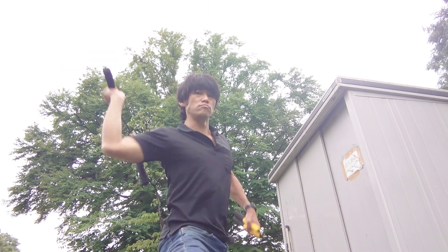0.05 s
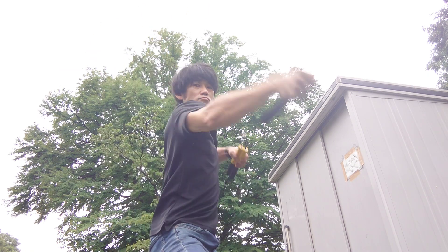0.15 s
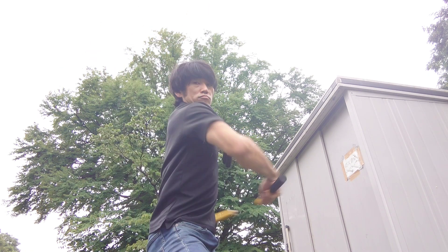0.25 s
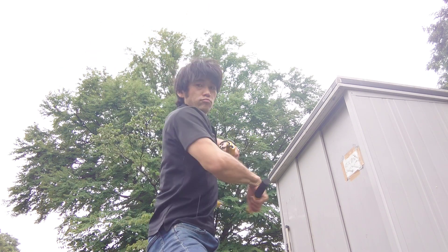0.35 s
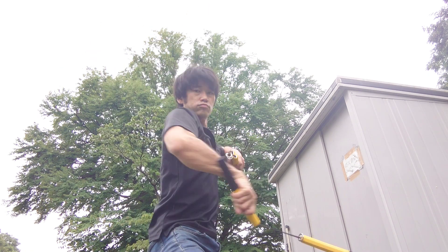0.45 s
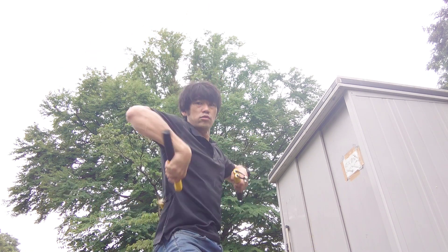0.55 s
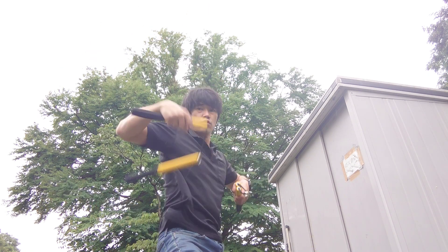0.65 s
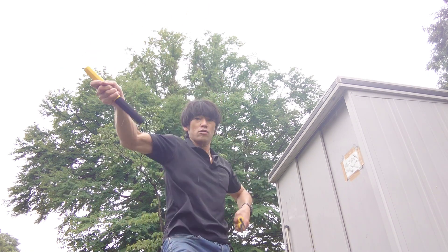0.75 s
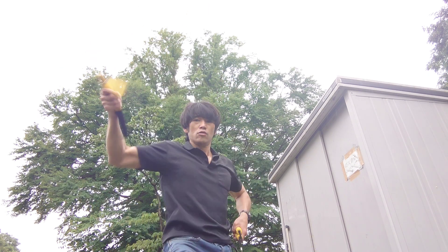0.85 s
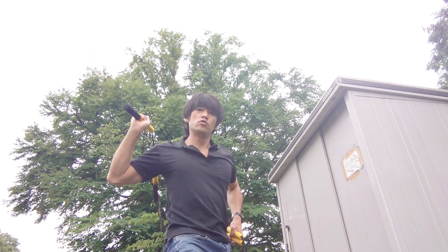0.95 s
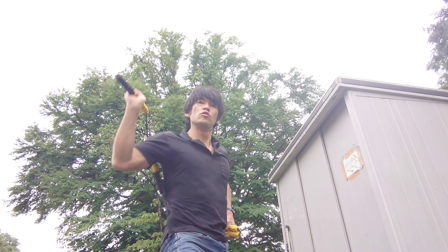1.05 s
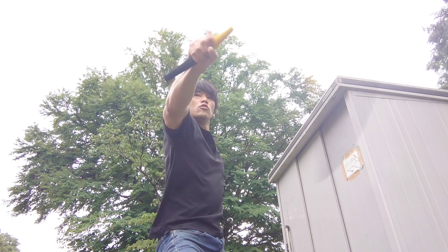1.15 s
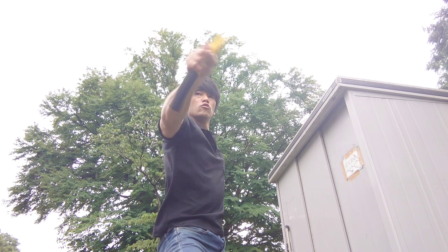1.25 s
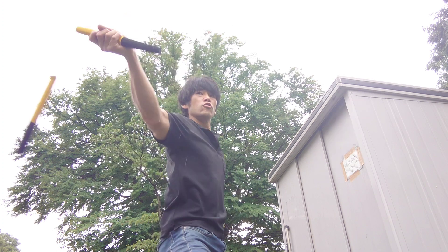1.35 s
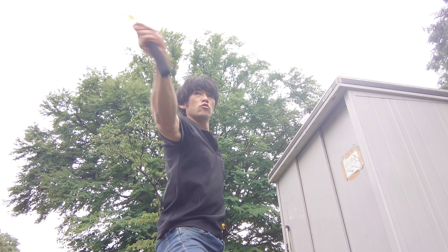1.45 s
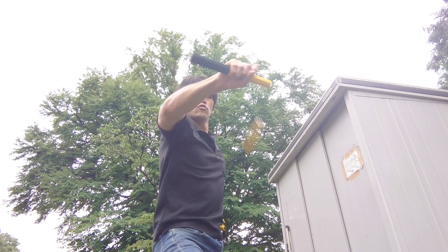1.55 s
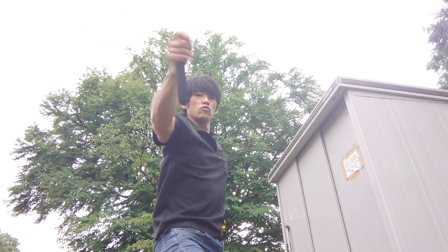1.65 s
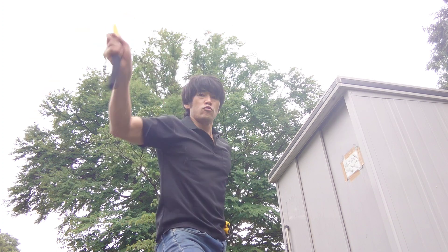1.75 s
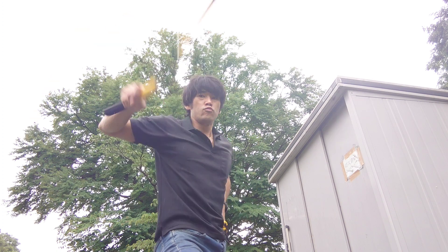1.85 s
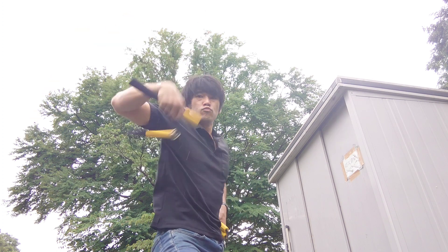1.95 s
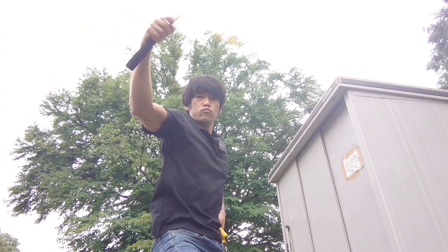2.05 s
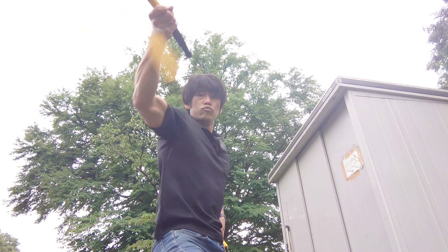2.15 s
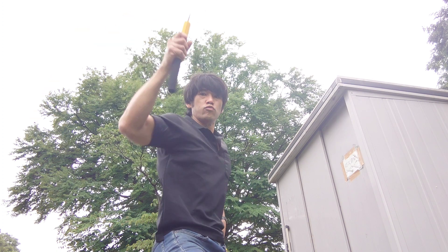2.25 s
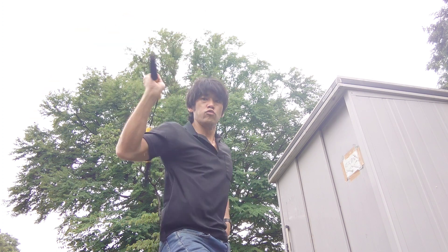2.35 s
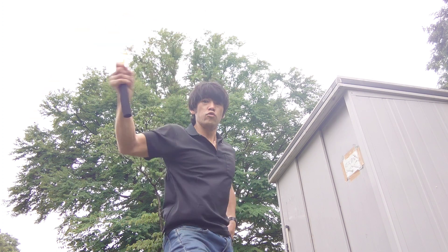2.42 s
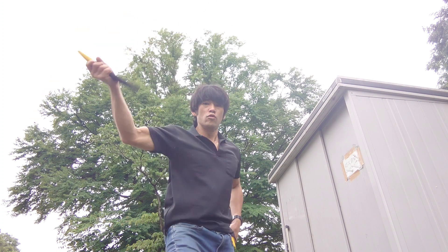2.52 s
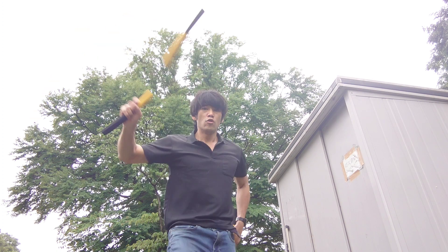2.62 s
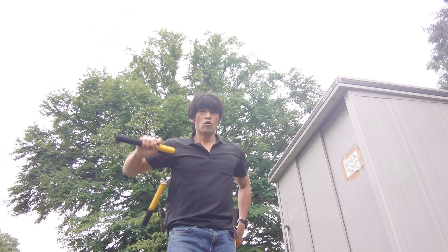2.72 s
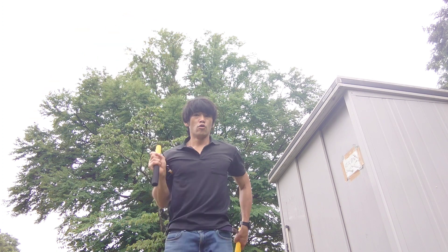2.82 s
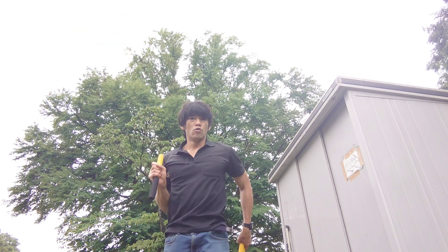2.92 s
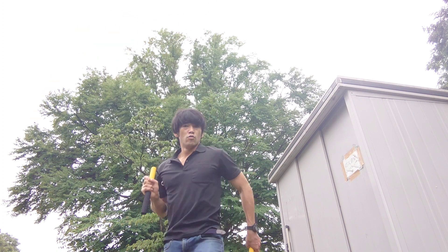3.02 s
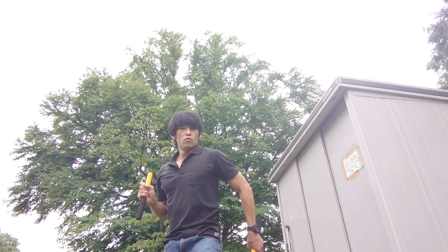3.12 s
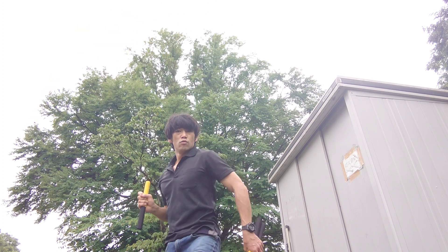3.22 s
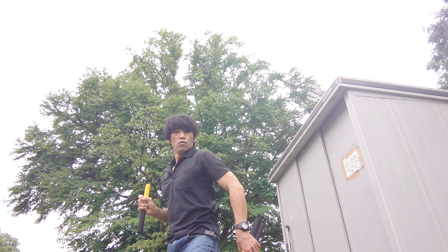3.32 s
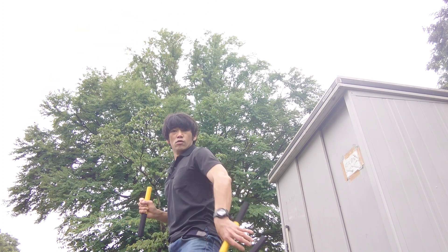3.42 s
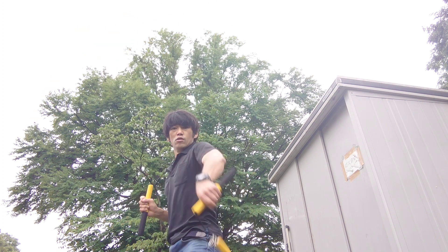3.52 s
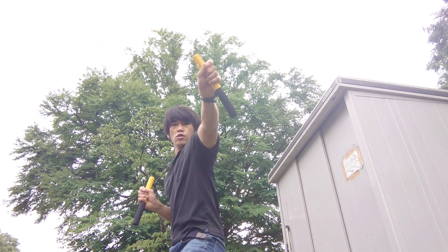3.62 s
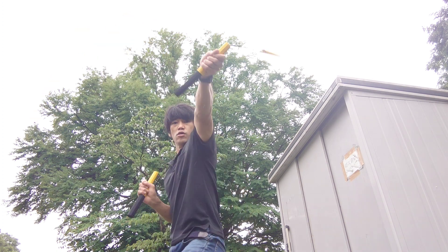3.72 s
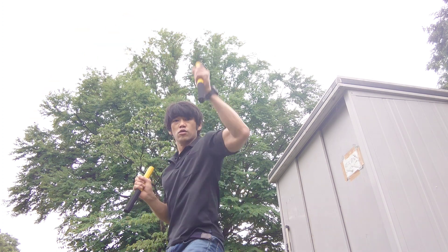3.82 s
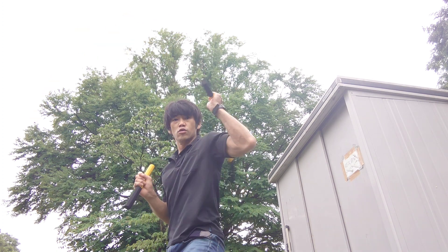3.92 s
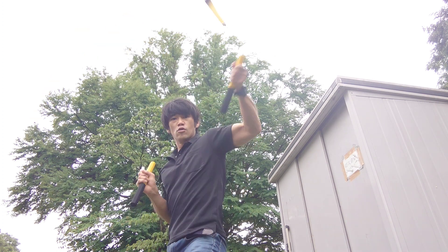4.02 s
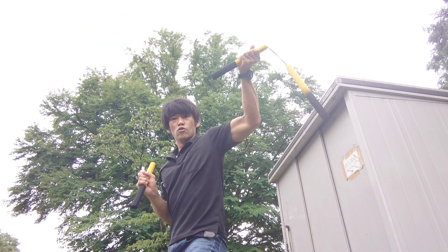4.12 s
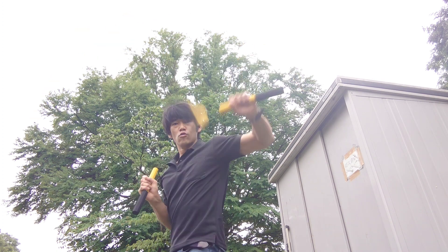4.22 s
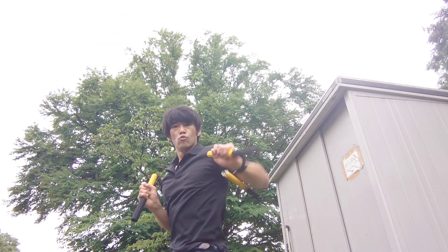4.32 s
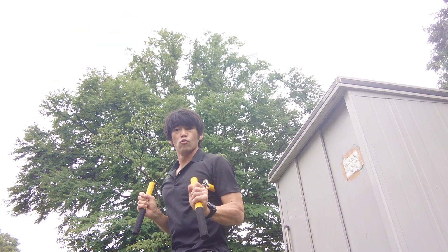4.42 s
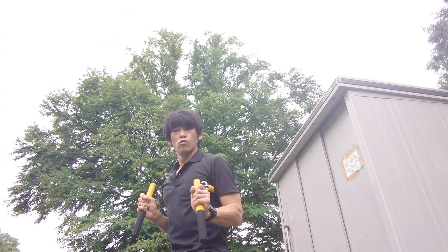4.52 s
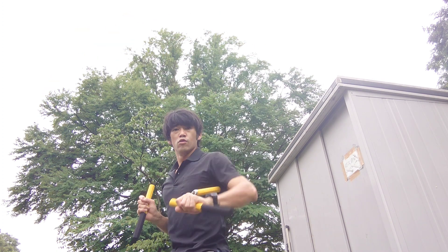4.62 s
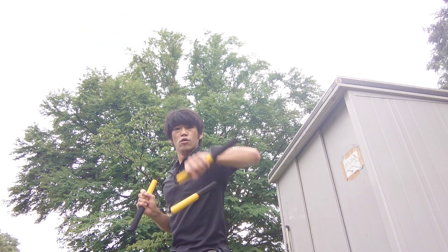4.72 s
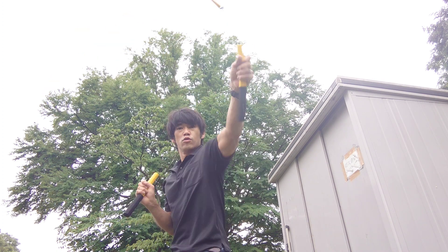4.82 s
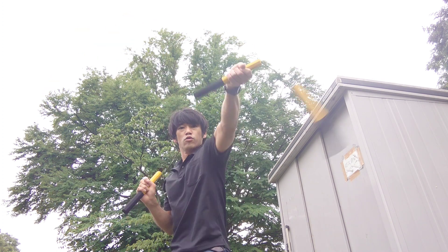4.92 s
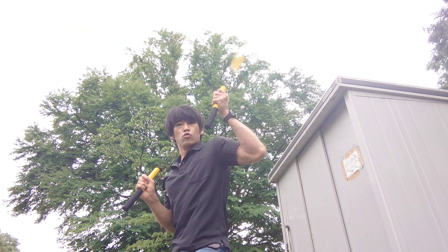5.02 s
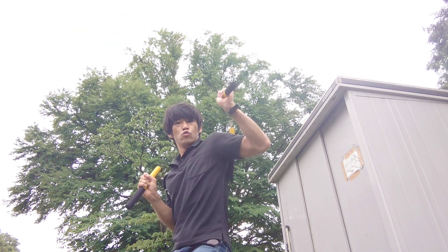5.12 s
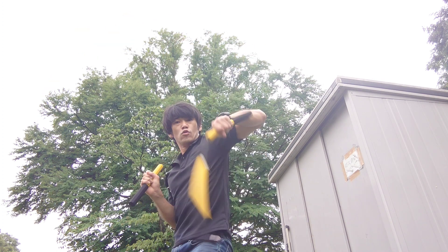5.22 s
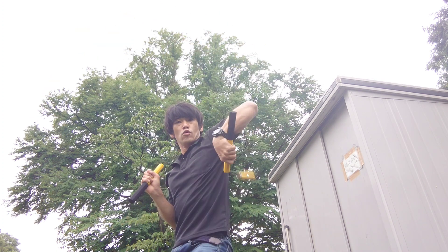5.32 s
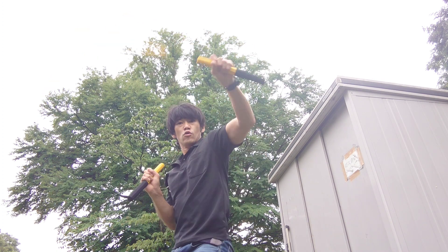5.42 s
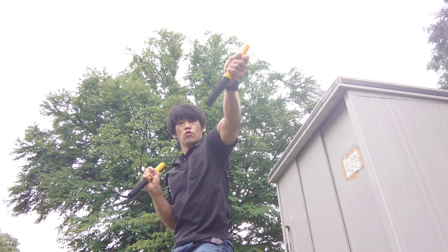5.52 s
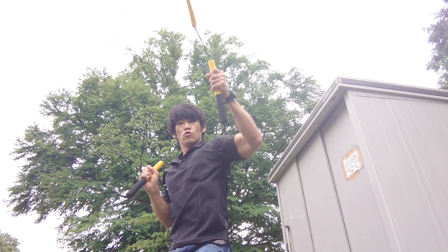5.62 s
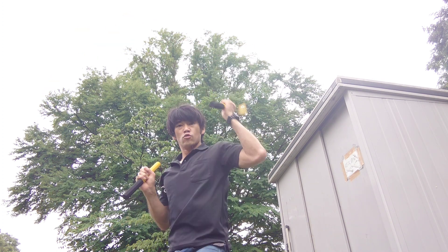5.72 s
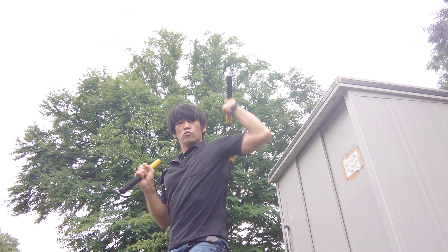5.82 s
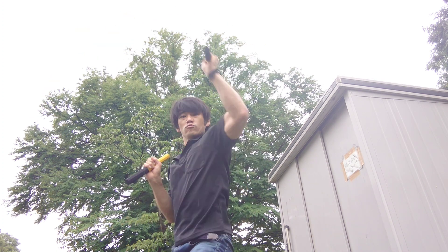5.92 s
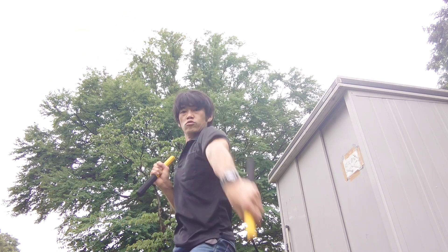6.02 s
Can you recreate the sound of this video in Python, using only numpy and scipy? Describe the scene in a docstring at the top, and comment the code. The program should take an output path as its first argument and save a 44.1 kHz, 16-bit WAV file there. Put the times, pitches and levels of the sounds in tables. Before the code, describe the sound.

Close, dry stereo sound in a quiet yard with a faint low hum and soft leaf rustle. Chained padded sticks swish past in short breaths, one gusting hard on the microphone early on. Chain snaps, bright link jingles and dull thuds on body and palm come in tight clusters, with strong knocks near two and just before three seconds. A calmer gap follows, then the other pair starts, busier and clackier to the end.

```python
"""In a yard, near a shed, two pairs of padded, chained sticks are swung above a low-lying stereo microphone.
Sticks thud on body and palm as short damped tones; chain snaps and link jingles are brief, higher tones.
Air swishes, cloth rubs and links slide as shaped noise that swells with each pass or jerk,
and air buffets the microphone ports, all over the steady noise of a far hum and the rustle of trees."""
import sys
import numpy as np
from scipy import signal
from scipy.fft import rfft, irfft, next_fast_len
from scipy.io import wavfile
from scipy.ndimage import uniform_filter1d, map_coordinates

SR = 44100
rng = np.random.default_rng(int(sys.argv[2]) if len(sys.argv) > 2 else 0)


def transcribe(signal):
    """Save signal, clipped to [-1, 1], as a 16-bit WAV file at the path in sys.argv[1]."""
    frames = np.atleast_2d(signal).T
    limited = np.clip(frames, -1, 1)
    pcm = np.round(limited * 32767).astype(np.int16)
    wavfile.write(sys.argv[1], SR, pcm)


N = 267687  # samples, about 6.07 s

# The yard's far hum and trees. Each row: frequency in Hz, spectrum level in dB.
YARD_SPECTRUM = [(25, -1), (70, 7.5), (130, -16.5), (250, -36), (450, -27), (1000, -24.5), (2500, -24),
                 (6000, -32.5), (8000, -52), (13000, -36), (16000, -42)]
YARD_DB = -52

# How busy arms and sticks are between passes. Each row: time in seconds, base level in dB.
BUSTLE = [(0, -50), (.36, -56.5), (.8, -51), (2.3, -56.5), (2.42, -62), (2.7, -47.5), (3.05, -61),
          (3.5, -66), (3.7, -51), (4.4, -58), (4.65, -67.5), (5, -51), (6.07, -50)]
CALM_PORT_DB, CALM_AIR_DB, CALM_SLIDE_DB = 5, 2, -4  # base levels of those layers over the bustle

# A stick whips past. Each row: closest point in seconds, swish level in dB,
# level of air on the ports in dB, length of the draught in seconds.
SWINGS = [(.02, -46.5, -58, 0.026), (.53, -42.5, -45, 0.061), (.703, -36.5, -44, 0.014),
          (.8, -44, -37, .03), (.953, -37, -45, 0.025), (1.132, -51, -37.5, 0.027),
          (1.249, -31.5, -22.5, 0.024), (1.41, -41, -38.5, 0.053), (1.605, -43, -29.5, 0.047),
          (1.76, -47, -35, 0.07), (1.931, -36, -27.5, 0.018), (2.12, -38.5, -28.5, 0.048),
          (2.27, -42.5, -31.5, 0.055), (2.469, -35.5, -43.5, 0.014), (2.699, -28.5, -46, 0.041),
          (2.913, -33.5, -60, 0.019), (3.64, -37.5, -42, 0.052), (3.76, -38, -47, 0.051),
          (3.96, -46, -39, .04), (4.047, -34.5, -41, 0.03), (4.17, -35.5, -43, 0.038),
          (4.3, -32.5, -41, 0.018), (4.44, -42.5, -40, 0.028), (5.03, -43.5, -41, 0.038),
          (5.3, -33.5, -32, 0.043), (5.5, -39, -31.5, 0.079), (5.75, -44.5, -50, 0.041),
          (6.05, -33, -43, .02)]
SWISH_SLOPES, PORT_SLOPES = (243, 246), (550, 300)  # dB per s of the rise before and the fall after

# Swish of air round a stick. Each row: frequency in Hz, spectrum level in dB.
SWISH_SPECTRUM = [(125, -42), (230, -19), (410, 0), (800, -3), (1000, -6), (1250, -13), (2300, -19),
                  (3300, -38), (6000, -110)]
# Air pushing on the microphone ports. Each row: frequency in Hz, spectrum level in dB.
PORT_SPECTRUM = [(16, -40), (26, -17), (52, -4), (96, 0), (128, -5), (175, -18), (250, -34), (400, -58),
                 (800, -110)]

# The chain is jerked and rattles out. Each row: time of the jerk in seconds,
# cloth and swivel level in dB, sliding link level in dB.
JERKS = [(.13, -47, -38), (.259, -41, -46), (0.51, -40.5, -38), (0.705, -41.5, -42.5), (0.901, -37.5, -36),
         (1.134, -38.5, -38), (1.24, -45, -41), (1.399, -39.5, -39), (1.616, -50.5, -43),
         (1.855, -43, -33.5), (2.07, -68, -43), (2.146, -38, -43), (2.29, -50, -49), (2.539, -39.5, -36.5),
         (2.717, -35, -36.5), (2.83, -50, -37.5), (2.913, -43, -58), (3.654, -35.5, -36),
         (3.78, -38.5, -44), (4.048, -43, -43), (4.13, -38, -35.5), (4.298, -37, -42), (4.44, -43.5, -40),
         (4.779, -45.5, -41.5), (5.038, -37, -36.5), (5.3, -36.5, -30.5), (5.458, -42, -56),
         (5.542, -46, -45.5), (5.87, -40.5, -70), (5.981, -42.5, -47), (6.066, -44, -39)]
RUB_SLOPES, SLIDE_SLOPES = (167, 137), (245, 156)  # dB per s of the rise before and the fall after

# Cloth and swivel rattle. Each row: frequency in Hz, spectrum level in dB.
RUB_SPECTRUM = [(760, -73), (1300, -7), (1590, -7), (2970, -3.5), (3580, -5.5), (4980, -6.5), (6060, -2),
                (7210, -21.5), (8500, -19.5), (11000, -45), (18700, -120)]
# Sliding links. Each row: frequency in Hz, spectrum level in dB.
SLIDE_SPECTRUM = [(4410, -27), (7500, -12.5), (9170, -9), (10200, -8), (13400, 0), (15900, -6),
                  (16500, -39)]

# A stick lands on body or palm. Each row: contact in seconds, level in dB, t60 at the pitch in seconds,
# pitch in Hz.
THUDS = [(0.0834, -19.5, 0.013, 730), (0.1454, -19.5, 0.0079, 880), (0.4923, -26, 0.0081, 1380),
         (0.68, -13, 0.0097, 690), (0.8215, -19.5, 0.015, 860), (1.1032, -23.5, 0.014, 530),
         (1.1414, -15.5, 0.015, 467), (2.0564, 0.5, 0.02, 527), (2.1164, -27, 0.018, 900),
         (2.4631, -11.5, 0.023, 423), (2.5231, -18, 0.034, 463), (2.5882, -22.5, 0.03, 866),
         (2.706, -20, 0.045, 938), (2.7182, -16.5, 0.036, 876), (2.853, 0, 0.0043, 732),
         (3.5786, -27.5, 0.0091, 1460), (3.6311, -24, 0.02, 540), (3.645, -26, 0.0097, 1210),
         (3.7649, -15, 0.011, 730), (4.028, -11.5, 0.027, 603), (4.037, -12.5, 0.015, 456),
         (4.1736, -20.0, 0.022, 820), (4.4261, -7.0, 0.017, 808), (4.4372, -4, 0.016, 600),
         (4.7624, -23, 0.017, 602), (4.823, -19.5, 0.026, 1376), (5.2093, -3.5, 0.013, 454),
         (5.277, -27, 0.013, 980), (5.444, 1, 0.018, 553), (5.531, -15, 0.02, 450),
         (6.0484, -17.5, 0.013, 387)]
# Modes of a padded stick. Each row: frequency as a multiple of the pitch, relative level in dB.
PAD_MODES = [(1.001, 3), (1.45, -5.5), (1.85, -3), (3, -1.5), (4.1, -16), (5.4, -33)]

# The chain snaps on a cap. Each row: contact in seconds, level in dB, t60 near 2700 Hz in seconds,
# brightness in dB.
CLACKS = [(.1377, -20.5, 0.02, -10), (0.2074, -22.5, 0.01, 1), (0.5671, -26, .012, 4),
          (.4923, -29, .009, -5), (0.682, -22, 0.011, 18), (.7056, -17, 0.017, 3),
          (0.7343, -16, .021, -6.5), (0.8142, -4, 0.0096, 2.5), (0.8204, -6, 0.018, -2),
          (1.1424, -10.5, .0043, 11.5), (1.2108, -21, 0.017, -14), (1.2343, -10, 0.0065, -7.5),
          (1.3985, -9.5, 0.0059, -7), (1.7615, -25.5, .011, -1), (1.8534, -19, 0.0062, 2),
          (1.9035, -22.5, 0.0065, 3), (2.0552, -8.5, 0.034, -7), (2.067, -11, .007, -10),
          (2.117, -3.5, 0.0059, -10.5), (2.1525, -4.5, .015, 1), (2.455, -16, .006, -14),
          (2.4633, -9, 0.012, 12.5), (2.5175, -10, 0.0061, 4), (2.5274, -14, 0.021, -2),
          (2.5899, -2.5, 0.022, 11), (2.7245, -12, 0.0079, -26), (2.8506, -18.5, 0.029, 8),
          (3.545, -31, 0.0089, -3), (3.5716, -18.5, .0045, -15), (3.6462, -16, 0.015, -1),
          (3.6518, -18, .013, -12), (3.763, -2.5, 0.0063, -5.5), (4.028, -22, .0065, -1),
          (4.0371, -11, 0.0062, -2), (4.0487, -14, 0.0034, -16), (4.0995, -19, 0.0091, -10),
          (4.108, -15.5, 0.012, 3), (4.172, -10, .007, -4), (4.1766, -11, 0.0087, 4),
          (4.2126, -22, 0.023, 11.5), (4.2766, -23, 0.0073, -10), (4.4266, -3.5, 0.0022, -10),
          (4.4395, -12, 0.0061, -15), (4.763, -10, 0.014, -7), (4.825, -12, 0.033, -10),
          (4.8932, -1, 0.0065, -9), (5.0273, -18, 0.018, -4), (5.0342, -7.5, 0.0055, -2),
          (5.0953, -22, 0.01, 1), (5.2105, -8, 0.002, 0), (5.251, -16.5, .007, 17),
          (5.2634, -19.5, .01, -6), (5.2772, -10, 0.0052, 12), (5.329, -4, 0.0049, -5.5),
          (5.4437, -14, 0.027, -1), (5.5322, -4.5, 0.015, -5), (5.5381, -6.5, 0.0063, 4),
          (5.708, -29.5, .008, 4), (5.747, -22, .011, -5.5), (5.824, -28, 0.015, -10),
          (5.808, -29, .006, -14), (5.845, -26, .006, -13), (5.869, -20, 0.0046, -12),
          (5.89, -23, 0.0047, -25), (5.918, -22, .01, -7), (5.952, -25, 0.011, -1),
          (5.9933, -20.5, 0.0042, -4), (6.054, -23, 0.0089, -6)]
# Main frequency bands of a clack, as the microphone colours it. Each row: nominal frequency in Hz,
# relative level in dB, share of the brightness.
CLACK_BANDS = [(1650, -12, .2), (2700, 0, 0), (3450, -3, 0), (4500, -5, .9), (5800, -1, 1.1), (7000, -9, 1),
               (11300, -12, .6)]
CLACK_PAN_DB = 3  # standard deviation of the left-right difference

# A stick sweeps close to the microphone. Each row: time in seconds, level in dB.
PUFF = [(.222, -48), (.244, -11), (.257, -9.5), (.27, -7), (.281, -24.5), (.295, -18.5), (.312, -28.5),
        (.35, -52)]
# Air of that close sweep. Each row: frequency in Hz, spectrum level in dB.
SWEEP_SPECTRUM = [(25, -22), (60, -9), (120, -7), (195, 0), (300, -5), (500, -13), (1000, -24), (2500, -36),
                  (6000, -41), (14000, -50)]

# Links strike each other. Each row: contact in seconds, level in dB, base t60 in seconds.
JINGLES = [(.491, -25, .043), (0.68, -28, 0.021), (0.7, -24, .011), (.7116, -19, 0.044),
           (0.7455, -20, 0.014), (.8138, -19.5, 0.12), (0.8807, -18.5, .05), (0.9, -10.5, 0.02),
           (1.0025, -24, 0.032), (1.14, -18, .013), (1.1865, -24, 0.035), (1.3787, -27, 0.0099),
           (1.4675, -12.5, 0.003), (1.8508, -22, 0.021), (1.9021, -31, .02), (2.0658, -12, 0.043),
           (2.1569, -17, .014), (2.2235, -26, 0.055), (2.4629, -16.5, 0.0054), (2.5232, -14, 0.015),
           (2.587, -20, 0.026), (2.8587, -17, 0.022), (2.9, -20, .041), (2.9117, -15.5, .018),
           (3.6457, -23, .024), (3.769, -11, 0.023), (4.0355, -22.5, 0.018), (4.0808, -17, .015),
           (4.109, -15.5, 0.015), (4.179, -20, 0.025), (4.425, -29, .035), (4.45, -22, 0.023),
           (4.7595, -19, 0.02), (4.828, -21.5, 0.014), (4.852, -23, 0.011), (5.0333, -17, .014),
           (5.093, -14, 0.011), (5.1453, -22, 0.022), (5.24, -17, .011), (5.249, -11.5, 0.0081),
           (5.2763, -16, .018), (5.329, -15.5, .023), (5.4496, -16.5, 0.024), (5.5406, -5.5, 0.015),
           (5.7693, -29, .011), (6.047, -22.5, .017)]
# Modes of a small steel link. Each row: nominal frequency in Hz, relative level in dB, share of the t60.
LINK_MODES = [(10750, 0, 1.6), (11250, -1, 1.2), (12600, -2, .8), (13800, -2, .8), (14700, -4, .7),
              (15550, 0, .9)]

# Scattered sound of the place. Each row: frequency in Hz, t60 in seconds.
ECHO_T60 = [(300, 0.031), (2500, 0.05), (12000, 0.081)]
HITS_LOW_HZ = 293  # high-pass corner of the hits, which have little bass

# Likeness of the two channels. Each row: frequency in Hz, left-right correlation.
ALIKE = [(60, .99), (500, .95), (1000, .8), (2800, .55), (5700, .2), (8000, .55), (13000, .65)]
# Unequal ports. Each row: frequency in Hz, level of left over right in dB.
PORT_GAIN = [(60, -2.5), (300, -2.2), (700, .3), (1500, 1), (4000, -.5), (9000, -7), (14000, -.5)]
# Unequal reach of the ports. Each row: frequency in Hz, phase by which left leads right in radians.
PORT_LEAD = [(50, .1), (500, .2), (1000, 0), (1800, -.8), (4000, -1.3), (8000, -.2), (14000, 0)]
TOP_HZ = 15950  # upper band limit of the microphone channel

HALF_EACH = np.array([[.5], [-.5]])  # splits a left-right difference between the channels
FADE_IN_S = .004  # fade-in time before the peak of a strike


def amp(db):
    """Gain of a level in dB."""
    return 10 ** (np.asarray(db) / 20)


def unit(x):
    """x at rms 1."""
    return x / np.sqrt(np.mean(x ** 2) + 1e-20)


def along(points, hz):
    """Values at hz from (Hz, value) points, read on a log frequency axis."""
    f, value = np.transpose(points)
    return np.interp(np.log(hz + 1), np.log(f + 1), value)


def curves(rows):
    """One value per sample for each column after the time."""
    s, *columns = np.transpose(rows)
    return [np.interp(np.arange(N) / SR, s, column) for column in columns]


def wobble(rate):
    """A smooth random curve with rate knots a second."""
    knots = rng.standard_normal(int(N * rate / SR) + 4)
    return map_coordinates(knots, [np.arange(N) * rate / SR])


def filtered(x, response):
    """x times a complex response of frequency, padded so that its end does not wrap round."""
    m = next_fast_len(N + SR // 2)
    return irfft(rfft(x, m) * response(np.fft.rfftfreq(m, 1 / SR)), m)[..., :N]


def rush(spectrum, grain_db, rate):
    """Stereo noise of rms 1, lumpy in time, whose channels are alike by frequency as ALIKE says."""
    pair = rng.standard_normal((2, N)) * amp(grain_db * wobble(rate))

    def mid_side(hz):
        turn = np.arccos(np.clip(along(ALIKE, hz), -1, 1)) / 2
        return amp(along(spectrum, hz)) * [np.cos(turn), np.sin(turn)]

    mid, side = filtered(pair, mid_side)
    return unit(np.array([mid + side, mid - side]))


def swells(at, db, slopes, base_db, hold=0):
    """Gain of a base level plus, in power, swells that rise, hold and fall at fixed dB rates."""
    step = 64  # samples between computed points
    t = np.arange(0, N + step, step)[:, None] / SR - at
    rise = slopes[0] * t
    fall = slopes[1] * (np.abs(hold) - t)
    level = db + np.minimum(0, np.minimum(rise, fall))
    power = amp(2 * level).sum(1)
    power = np.interp(np.arange(N), np.arange(len(t)) * step, power)
    return np.sqrt(power + amp(2 * base_db))


def ticks(rate, spread_db):
    """A gain over 1 that jumps at random small contacts, rate a second, and falls within a few ms."""
    kicks = (rng.random(N) < rate / SR) * amp(spread_db * rng.exponential(size=N))
    return 1 + signal.lfilter([1], [1, -np.exp(-1 / (0.0041 * SR))], kicks)


def speckled(x, depth_db):
    """Small contacts differ in colour: a random gain over short patches of time and frequency."""
    z = signal.stft(x, nperseg=128)[2]
    field = rng.standard_normal(z.shape[1:])
    field = uniform_filter1d(field, size=3, axis=0)  # over frequency
    field = uniform_filter1d(field, size=5, axis=1)  # over time
    return unit(signal.istft(z * amp(depth_db * unit(field)), nperseg=128)[1][:, :N])


def strike(hz, db, t60, attack, blur, scatter_db, size):
    """Damped modes of random strength after a faint, short fade-in; blur (radians) lets phases wander."""
    t = np.arange(size) / SR - FADE_IN_S
    drift = blur * np.cumsum(rng.standard_normal((len(hz), size)), 1)
    level = db + scatter_db * rng.standard_normal(len(hz))
    # each mode reaches the ports by its own path
    apart = np.sqrt(-np.log(along(ALIKE, hz)) / 2) * rng.standard_normal(len(hz))
    after = np.maximum(t, 0)
    decay = amp(-60 * after / np.abs(t60)[:, None]) * (1 - np.exp(-after / attack))
    onset = amp(-15.5) * np.exp(np.minimum(t, -3 * t) / 0.00076)
    turning = np.exp(1j * (2 * np.pi * hz[:, None] * t + drift))
    modes = amp(level)[:, None] * (decay + onset) * turning
    ring = (np.exp(1j * np.outer([1, -1], apart)) @ modes).imag
    # the mono peak becomes 1, unless that would leave one channel far louder
    mono_peak = np.abs(ring.mean(0)).max()
    return ring / mono_peak.clip(0.76 * np.abs(ring).max())


def add(track, s, sound, db, pan_db):
    """Lays one strike on both channels, contact at s."""
    part = track[:, round((s - FADE_IN_S) * SR):][:, :sound.shape[1]]
    part += amp(db + HALF_EACH * pan_db) * sound[:, :part.shape[1]]


def yard():
    """Far hum and trees: steady noise whose level drifts slowly."""
    return amp(YARD_DB) * rush(YARD_SPECTRUM, grain_db=2.0, rate=2)


def passes(busy_db):
    """A passing stick sheds turbulent air that swishes, and its draught throbs on the ports."""
    at, swish_db, port_db, hold = np.transpose(SWINGS)
    throb_gain = swells(at, port_db, PORT_SLOPES, busy_db + CALM_PORT_DB, hold)
    throb = throb_gain * rush(PORT_SPECTRUM, grain_db=4.0, rate=16)
    swish_gain = swells(at, swish_db, SWISH_SLOPES, busy_db + CALM_AIR_DB, hold)
    return throb + swish_gain * rush(SWISH_SPECTRUM, grain_db=5.0, rate=40)


def jerks(busy_db):
    """Each jerk of the chain rattles cloth and swivel and sets links pattering in many small contacts."""
    at, rub_db, slide_db = np.transpose(JERKS)
    shake = amp(1.2 * wobble(25))  # the chain goes slack and tight
    rub = unit(shake * ticks(220, spread_db=2.5) * rush(RUB_SPECTRUM, grain_db=1.0, rate=110))
    slide = unit(shake * ticks(180, spread_db=2.5) * rush(SLIDE_SPECTRUM, grain_db=3.5, rate=110))
    rub_gain = swells(at, rub_db, RUB_SLOPES, busy_db)
    slide_gain = swells(at, slide_db, SLIDE_SLOPES, busy_db + CALM_SLIDE_DB)
    return rub_gain * speckled(rub, 2.5) + slide_gain * speckled(slide, 5.0)


def sticks():
    """A padded stick gives a few dull cycles; its overtones die sooner."""
    out = np.zeros((2, N))
    multiple, level = np.transpose(PAD_MODES)
    for s, db, t60, pitch in THUDS:
        thud = strike(pitch * multiple, level, t60 / multiple ** 0.72, attack=0.0012,
                      blur=0.03, scatter_db=0.5, size=2000)
        add(out, s, thud, db, pan_db=0)
    return out


def echoes(x):
    """Shed wall, ground and leaves scatter each hit: its power lingers as noise, dying by frequency."""
    hz, t, z = signal.stft(x.mean(0), SR, nperseg=128)
    keep = amp(-120 * (t[1] - t[0]) / along(ECHO_T60, hz))  # share of power left after one frame
    power = np.array([signal.lfilter([0, 1 - k], [1, -k], p) for k, p in zip(keep, np.abs(z) ** 2)])
    almost_flat = [(20, 0.0074), (20000, 0.013)]  # (Hz, dB)
    grains = rush(almost_flat, grain_db=3.0, rate=180)
    noise = signal.stft(grains, SR, nperseg=128)[2]
    return signal.istft(noise / np.std(noise) * np.sqrt(power), SR, nperseg=128)[1][:, :N]


def clacks():
    """Each clack is a brief, hard snap of chain on cap; its brightness lifts or lowers the upper bands."""
    out = np.zeros((2, N))
    hz, level, share = np.transpose(CLACK_BANDS)
    for s, db, t60, bright_db in CLACKS:
        tuning = 1 + 0.053 * rng.standard_normal(len(hz))
        clack = strike(hz * tuning, level + share * bright_db, t60 * (2700 / hz) ** 0.26, attack=0.00021,
                       blur=0.14, scatter_db=1.0, size=1300)
        add(out, s, clack, db, CLACK_PAN_DB * rng.standard_normal())
    return out


def close_sweep():
    """One close sweep of a stick throws turbulent air on the ports."""
    sweep = rush(SWEEP_SPECTRUM, grain_db=5, rate=66)
    near = slice(round(PUFF[1][0] * SR), round(PUFF[3][0] * SR))  # the strongest stretch sets the level
    level_db, = curves(PUFF)
    return amp(level_db) * sweep / np.std(sweep[:, near])


def links():
    """Small steel links ring high; each touch picks its own modes."""
    out = np.zeros((2, N))
    hz, level, share = np.transpose(LINK_MODES)
    for s, db, t60 in JINGLES:
        tuning = 1 + 0.0106 * rng.standard_normal(len(hz))  # no two links are quite alike
        blur = rng.uniform(.04, .3)  # a free link sings, a held one hisses
        jingle = strike(hz * tuning, level, t60 * share, attack=0.00024,
                        blur=blur, scatter_db=6.0, size=3000)
        add(out, s, jingle, db, rng.normal(0, 1.2))
    return out


def scene():
    """Everything that reaches the microphone: hits with their echoes, moving air and chain, the yard."""
    busy_db, = curves(BUSTLE)
    thud = sticks()
    steel = clacks() + links()
    hits = thud + steel + amp(-5.5) * echoes(thud) + amp(-4.5) * echoes(steel)
    hits = filtered(hits, lambda hz: (1j * hz / (HITS_LOW_HZ + 1j * hz)) ** 2)
    return yard() + passes(busy_db) + jerks(busy_db) + hits + close_sweep()


def record(dry):
    """Two microphone ports of unequal gain and reach, a soft ceiling, and the band limit."""
    def ports(hz):
        return amp(HALF_EACH * along(PORT_GAIN, hz)) * np.exp(1j * HALF_EACH * along(PORT_LEAD, hz))

    x = filtered(dry, ports)
    x = x / (1 + np.abs(x / .98) ** 6) ** (1 / 6)
    return filtered(x, lambda hz: hz < TOP_HZ)


dry = scene()
out = record(dry)
transcribe(out)
```